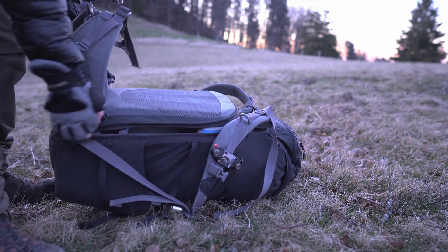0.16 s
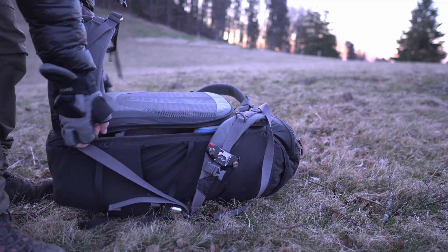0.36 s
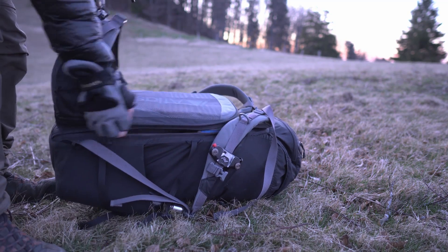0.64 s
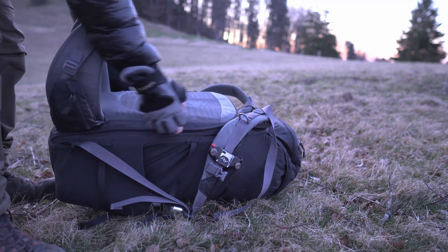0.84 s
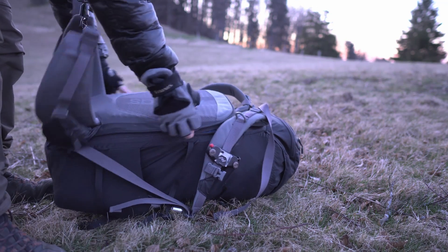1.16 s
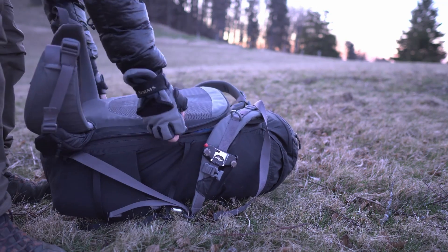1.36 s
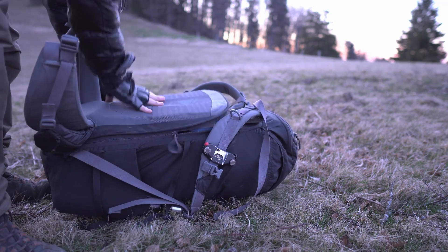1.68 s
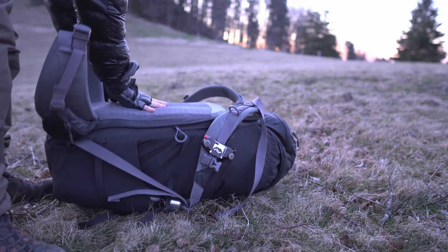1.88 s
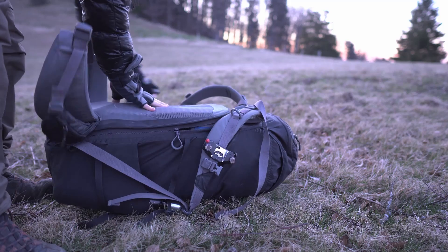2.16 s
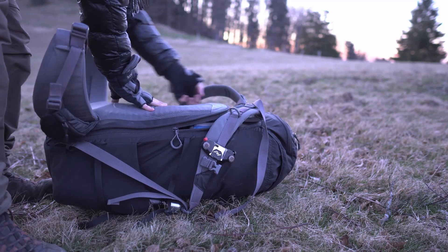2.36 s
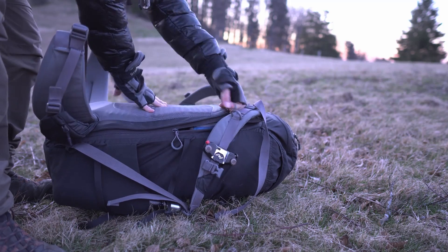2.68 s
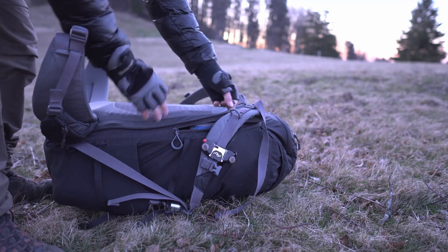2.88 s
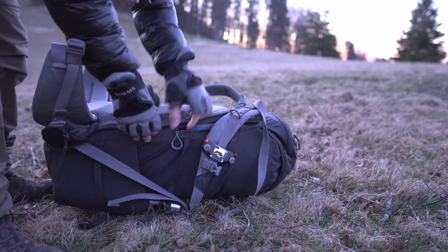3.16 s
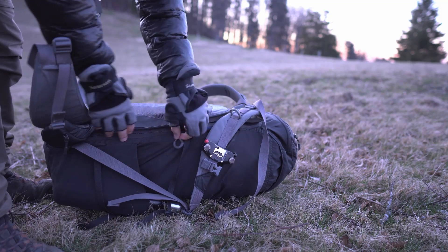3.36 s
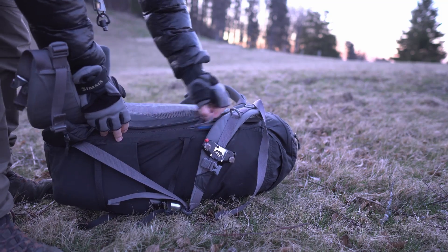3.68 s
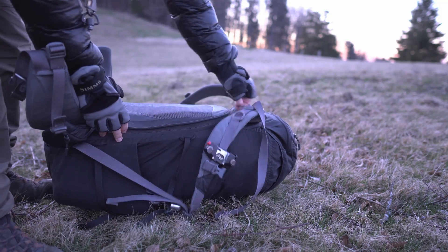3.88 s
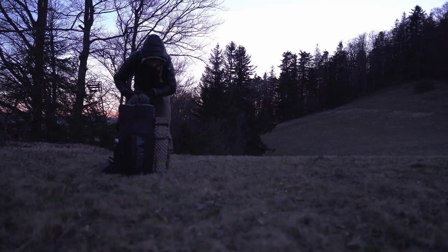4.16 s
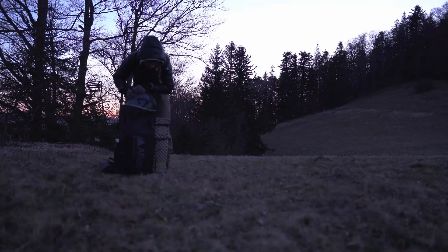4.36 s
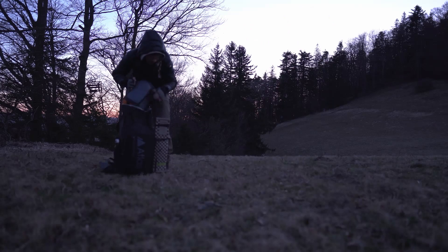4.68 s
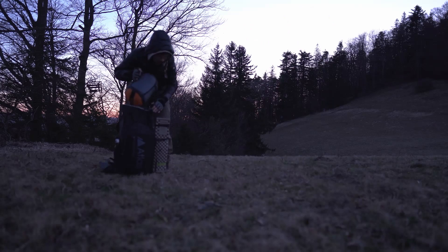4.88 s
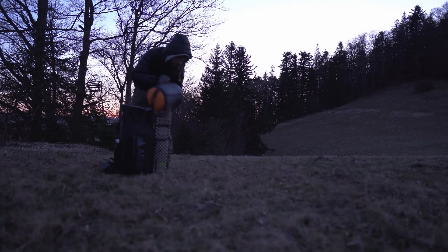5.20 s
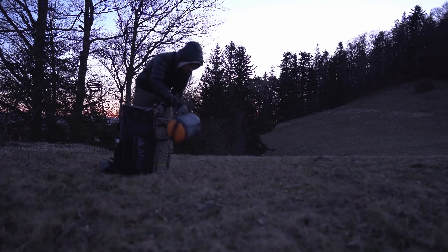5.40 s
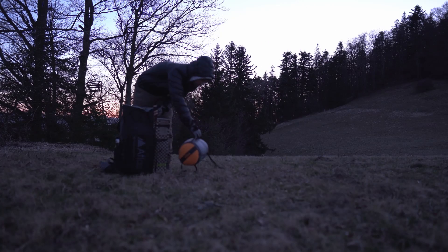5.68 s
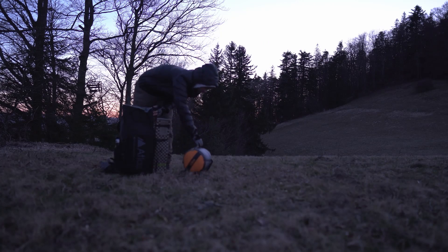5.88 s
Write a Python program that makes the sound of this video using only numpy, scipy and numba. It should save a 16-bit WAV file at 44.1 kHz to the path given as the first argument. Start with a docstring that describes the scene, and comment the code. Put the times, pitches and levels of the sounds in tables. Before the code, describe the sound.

Close up in a quiet meadow, a coil zipper on a padded backpack is drawn in short, uneven, buzzing strokes, with fabric rustle, tab ticks, a small buckle clink and soft thuds between. A last, louder zip ends abruptly; the background jumps to a louder wavering hum and hiss, a pack knocks down hard on dry grass, and a pot is set down softly in rustling grass.

```python
"""A coil zipper on a backpack is pulled shut in short strokes in a meadow; its teeth push on the slider one by one.
Cloth rustles as bands of crackling noise, tabs tick and a buckle rings as short fading tones, the bag thuds low.
Then, with the gain set higher, a pack is knocked down on dry grass and a pot is lowered into the grass.
Shaped noise makes the faint wind and hiss, which is louder and has a wavering hum in this second part."""
import sys
import numpy as np
from scipy import signal
from scipy.fft import rfft, irfft
from scipy.io import wavfile
from scipy.ndimage import uniform_filter1d
from numba import njit

SR = 44100
rng = np.random.default_rng(int(sys.argv[2]) if len(sys.argv) > 2 else 0)


def dump_mix(stems):
    """Bounce the given channels to the path in sys.argv[1] as a 16-bit WAV at rate SR."""
    frames = np.atleast_2d(stems).T  # one column per channel
    limited = np.clip(frames, -1, 1)  # hard clip at full scale
    pcm = np.round(limited * 32767).astype(np.int16)
    wavfile.write(sys.argv[1], SR, pcm)


N = 266364
STEP_S = 4.197  # the gain steps up here


def undb(db):
    """Turn decibels into a plain multiplier."""
    return 10 ** (np.asarray(db) / 20)


def unit(x):
    """Scale a sound to an average (rms) level of 1."""
    return x / np.sqrt(np.mean(x ** 2))


def columns(tables):
    """Join tables of (time_s, values) into one smooth curve a column."""
    time_s, *values = np.concatenate(tables).T
    return [np.interp(np.arange(N) / SR, time_s, v) for v in values]


def band(x, hz, width_hz):
    """One resonance: passes sound near its pitch, with gain 1 at the centre."""
    return signal.lfilter(*signal.iirpeak(min(hz, .45 * SR), hz / width_hz, SR), x)


def coloured(points):
    """Noise of rms 1 whose spectrum follows points of (pitch_hz, level_db)."""
    hz, db = np.transpose(points)
    f = np.fft.rfftfreq(N, 1 / SR) + 1
    gain = undb(np.interp(np.log(f), np.log(hz), db))
    return unit(irfft(rfft(rng.standard_normal(N)) * gain, N))


def walk(rate):
    """A curve that slides to a new random level this many times a second; spread near 1."""
    k = int(SR / rate)
    levels = np.repeat(rng.standard_normal(N // k + 1), k)
    return uniform_filter1d(levels, k)[:N]


def ring(hz, cycles, rise_s):
    """A struck object's tone: a soft contact, then a fade of 60 dB in so many cycles."""
    t = np.arange(int(cycles / hz * SR)) / SR
    fade = 1000 ** (-t * hz / cycles)
    return np.sin(2 * np.pi * hz * t) * fade * (1 - np.exp(-t / rise_s))


def add(out, s, x):
    """Mix a short sound into out, starting at s seconds."""
    i = int(s * SR)
    out[i:i + len(x)] += x[:N - i]


@njit
def teeth(hz, uneven, rough, chance, slip, scatter, stagger):
    """Left and right teeth push in turn, one row a little early; roughness scatters timing and size."""
    pulses, phase = np.zeros(len(hz) + 1), np.empty(len(hz))
    p, k = 0., 0  # way to the next tooth 0-1, teeth passed so far
    for i in range(len(hz)):
        side = 2 * (k % 2) - 1  # -1 for one row, +1 for the other
        step = 2 * hz[i] * np.exp(slip * rough[i] * chance[k, 0]) / (1 + stagger * side) / SR
        p += step
        if p >= 1:
            p, k = p - 1, k + 1
            side = 2 * (k % 2) - 1
            size = (1 + uneven[i] * side) * np.exp(scatter * rough[i] * chance[k, 1])
            # share the push between two samples, as it falls in between
            pulses[i] += size * p / step
            pulses[i + 1] += size * (1 - p / step)
        phase[i] = k + p
    return pulses[:-1], phase


# The pulls of the zipper, one list a stroke. Columns: time_s, tooth_pairs_hz (before the hand's jerks),
# level_db, unevenness of the two tooth rows (held to 0-1), roughness (held to 0-1)
STROKE_CURVES = [
    [(0, 560, -36.5, 0.78, 0.3), (.018, 576, -31, 1, 0.42), (.026, 546, -58, 0.9, .2)],
    [(.19, 140.9, -57, 0.6, 0.62), (.258, 199.5, -44, 1.04, 0.59), (.3, 209, -43, 0.68, 0.65),
     (.355, 158, -62, 0.87, 0.5)],
    [(.595, 198.6, -51.5, 1.17, .3), (.647, 208.3, -39, 0.59, 0.93), (.69, 340.9, -37.5, 0.52, 0.84),
     (.74, 261.6, -36.5, 0.69, 0.87), (.795, 359.2, -39.5, 0.25, 0.83), (.815, 451.6, -35, 0, 0.26),
     (.837, 537, -31, 0, 0.17), (.852, 404.3, -35.5, .15, 0.36), (.87, 501.4, -30, .15, 0.2),
     (.895, 422.3, -36.5, 0.4, 0.18), (.907, 453, -31.5, .5, 0.36), (.932, 309, -40, 0.82, 0.29),
     (.982, 208, -43, 0.95, 0.4), (1.06, 189, -58, .4, 0.75)],
    [(2.055, 276.6, -49.5, 0.7, 0.69), (2.102, 315.4, -39, 1.05, 0.42), (2.15, 233.8, -38, 1.2, 0.35),
     (2.165, 302, -38, 1.16, 0.22), (2.192, 572.5, -35, 0, 0.17), (2.225, 334.5, -34, 0.02, 0.42),
     (2.272, 227.5, -39.5, 0.06, 0.31), (2.305, 352.5, -35, 0.06, 0.36), (2.335, 1025, -38, 0, 0.24),
     (2.35, 952, -34, 0.02, 0.1), (2.362, 697, -36, 0.02, 0.16), (2.385, 988, -41, 0.48, 0.16),
     (2.407, 584, -38.5, 0.64, 0.4), (2.442, 564, -38, 1.15, 0.42), (2.465, 416, -45, 0.61, 0.65),
     (2.5, 479, -40, 0.78, .45), (2.537, 565.6, -31, 1.06, 0.06), (2.56, 483.4, -35.5, 0, 0.34),
     (2.577, 610, -29, 0.6, 0.34), (2.597, 410, -36.5, 0.8, 0.38), (2.617, 446, -36, 0.53, 0.43),
     (2.63, 563, -33, 0, 0.1), (2.667, 734, -39.5, 0, 0.28), (2.688, 517.6, -33, 0, 0.2),
     (2.702, 570, -40, 0.41, .45), (2.715, 433, -34, 0.37, 0.7), (2.735, 327.4, -42, 1.03, 0.73),
     (2.752, 299, -68, .9, .55)],
    [(3.64, 223.9, -64, 0.88, 0.92), (3.672, 255.4, -48.5, 1.09, 0.68), (3.705, 203, -40, 0.37, 0.65),
     (3.775, 370, -37, 0.81, 0.22), (3.82, 685, -30, 1.03, 0.17), (3.85, 556.5, -26.5, .22, .23),
     (3.875, 435, -28, 0.29, 0.44), (3.892, 390.6, -30, 0.16, 0.54), (3.902, 411.3, -22.5, 0, 0.53),
     (3.911, 290.2, -28, 0.8, 0.8), (3.925, 395.2, -29, 0.31, 0.61), (3.937, 471, -19, 0, .26),
     (3.947, 321, -30, 0.73, .2), (3.958, 422, -21.5, 0, .3), (3.98, 379, -24.5, 0.3, .15),
     (4.0, 402.5, -22.5, 0.5, .2), (4.022, 279.6, -26.5, 0.34, 0.37), (4.042, 283.7, -38.5, 0.86, 0.19),
     (4.056, 279, -72, 0.52, 0.2)],
]
# Resonances of slider and taut cloth. Columns: pitch_hz, width_hz, level_db (relative)
SLIDER_RESONANCES = [(283, 405, 6), (928, 366, 6), (1205, 186, 4), (2030, 610, -8.5), (2680, 1000, -16)]
# Grit of each stroke at the pivot level and 400 pairs a second. Column: level_db
STROKE_GRIT_DB = [-54.5, -46, -50, -54.5, -49.5]
GRIT_PIVOT_DB, GRIT_FOLLOW = -36.5, 0.5  # share of level changes the grit follows
GRIT_DB_PER_OCTAVE = 6.5  # its rise with speed


def zipper():
    """Teeth ring the slider, the slider rocks once a pair, grit follows each tooth; the pull shakes the bag."""
    hz, db, uneven, rough = columns(STROKE_CURVES)
    last_samples = [t[-1][0] * SR for t in STROKE_CURVES[:-1]]
    stroke = np.searchsorted(last_samples, np.arange(N))
    grit_db = np.take(STROKE_GRIT_DB, stroke) + GRIT_FOLLOW * (db - GRIT_PIVOT_DB)
    grit_db = grit_db + GRIT_DB_PER_OCTAVE * np.log2(hz / 400)
    uneven = np.clip(uneven, 0, 1)
    rough = np.clip(rough, 0, 1)
    hz = hz * (1 + (0.027 + .07 * rough) * walk(80))  # the hand jerks
    chance = rng.standard_normal((N // 20, 2))
    pulses, phase = teeth(hz, uneven, rough ** 1.4, chance, slip=.34, scatter=.55, stagger=.12)
    gate = np.exp(-(phase % 1) / 2.4)  # fades a little from each tooth to the next

    push = pulses - uniform_filter1d(pulses, size=400)  # keep the jolts, drop the steady push
    push = push + 0.054 * rough * gate * rng.standard_normal(N)
    body = sum((-1) ** k * undb(g_db) * band(push, f, w) for k, (f, w, g_db) in enumerate(SLIDER_RESONANCES))
    body = signal.sosfilt(signal.butter(2, 3200, fs=SR, output="sos"), body)
    # level follows the hand, not the tooth rate
    body = body / np.sqrt(uniform_filter1d(body ** 2, size=900) + 1e-12)

    # tape drags through the slider
    scrape = coloured([(200, -19), (600, -0.5), (1200, -5.5), (2200, -12.0), (3500, -29), (16000, -46)])
    scrape = (.04 + .6 * rough ** 1.4) * undb(2.5 * walk(200)) * scrape
    body = np.sqrt(1 - .5 * rough) * body + scrape
    rock = 2.33 * uneven ** 2.56 * undb(7.2 * rough * walk(120)) * np.sin(np.pi * phase)

    grit = coloured([(1500, -30), (2500, 0), (3300, -6), (6000, -10), (10000, -19), (16000, -17)])
    grit = gate * undb(2.2 * walk(150)) * grit
    hard_edge = unit(band(band(push, 2950, 4100), 3600, 4000))  # of each tooth
    grit = unit(grit) + 1.1 * hard_edge * np.sqrt(400 / hz)

    time = np.arange(N)
    moving = sum((time > t[0][0] * SR) & (time < t[-1][0] * SR) for t in STROKE_CURVES)
    shake = coloured([(20, 3.5), (60, 2.5), (160, 0.5), (300, -23), (16000, -86)])
    shake = uniform_filter1d(1. * moving, size=2000) * shake
    slider = undb(db) * (body + rock) / np.sqrt(1 + uneven ** 2)
    return moving * (slider + undb(grit_db) * unit(grit)) + undb(-56.5) * shake


# Swells of cloth and grass rubbing; rise and fall each span 20 dB. Columns: peak_s, peak_db, rise_s, fall_s,
# body_db (under 1.5 kHz, over the peak), top_db (top octave, over the peak)
RUSTLE_SWELLS = [(0.0, -52, .01, 0.31, 4.5, -5), (.2, -61, .3, 0.29, 8.5, -12),
                 (.4, -54.5, 0.052, 0.062, 5, -18), (1.111, -64, 0.21, 0.28, 2.5, -18),
                 (1.54, -75.5, 0.092, 0.24, 12, -14), (1.79, -58.5, 0.11, 0.064, 0.5, -14),
                 (2.85, -60, 0.05, 0.12, -17, 2.5), (3.11, -70, 0.049, 0.3, -11, -14),
                 (3.332, -58, 0.062, .12, -2.5, 0), (3.47, -58.5, 0.095, 0.054, -32, -1.5),
                 (4.08, -66.5, 0.041, 0.18, -5, -14), (4.15, -60.5, 0.1, 0.032, -8, -2),
                 (4.2, -39, .005, 0.16, 1, -20), (4.339, -25, 0.12, 0.21, -4, -19),
                 (4.45, -40.5, 0.3, 0.58, -3, -3), (5.5, -57, 0.2, 0.3, -10, 7.5),
                 (6.022, -33, 0.075, .3, -10, 4.5)]
# steady faint rubbing before and after the gain step, in dB: body, middle, top
NEAR_BED_DB, FAR_BED_DB = (-71, -73, -70.5), (-57.5, -59, -74)


def rustle():
    """Dense crackle of fibres: three bands share the grains and swells; body and top also flicker alone."""
    t = np.arange(N) / SR
    power = np.where(t < STEP_S, undb(NEAR_BED_DB)[:, None], undb(FAR_BED_DB)[:, None]) ** 2
    for s, db, rise_s, fall_s, body_db, top_db in RUSTLE_SWELLS:
        swell = undb(db - 20 * np.where(t < s, (s - t) / rise_s, (t - s) / fall_s))
        swell = swell * ((t < STEP_S) == (s < STEP_S))  # stays on its own side of the gain step
        power = power + (undb([[body_db], [0], [top_db]]) * swell) ** 2
    body, middle, bright = np.sqrt(power)
    grain = undb(3.0 * walk(600) + 1.3 * walk(90))
    low = coloured([(150, 19.5), (400, 12.5), (1200, 10.5), (2200, -16)])
    mid = coloured([(1000, 0.5), (2200, 3), (5000, -0.5), (8500, -6.0), (11000, -15.0)])
    top = coloured([(7000, -9.5), (10500, -17.5), (15000, -10.5)])
    body_sound = body * undb(0.95 * walk(60)) * unit(grain * low)
    bright_sound = bright * undb(1.5 * walk(65)) * unit(grain * top)
    return middle * unit(grain * mid) + body_sound + bright_sound


# Spectrum of the air before the gain step. Columns: pitch_hz, level_db (per Hz, relative)
NEAR_SPECTRUM = [(12, -44), (20, 8.5), (63, 3.5), (301, -4.5), (367, -10), (513, -16.5), (825, -48),
                 (1530, -17), (5680, -37), (16000, -57)]
# Spectrum of the air after the gain step. Columns: pitch_hz, level_db (per Hz, relative)
FAR_SPECTRUM = [(12, -42), (20, -2), (60, -15), (130, 1), (172, -5), (210, 3), (262, -12), (607, -24.5),
                (2820, -38), (3070, -38), (6360, -34.5), (9670, -39.5), (14700, -33.5), (16000, -37)]
NEAR_DB, FAR_DB = -64, -41.5  # levels the air wavers around


def air():
    """Faint wind and microphone hiss as noise; louder, with a wavering hum, after the step."""
    near = coloured(NEAR_SPECTRUM) * undb(NEAR_DB + 0.5 * walk(2.3))
    far = coloured(FAR_SPECTRUM) * undb(FAR_DB + 0.31 * walk(14.0))
    return np.where(np.arange(N) < STEP_S * SR, near, far)


# small stray ticks while the hands move about: lowest level, average extra level, middle pitch, snap over level
FAINT_TICK_DB, FAINT_SCATTER_DB, FAINT_TICK_HZ, FAINT_SNAP_DB = -62.5, 2, 2000, 4


def faint_ticks(count):
    """Random rows like the tick table's, before the gain step, within an octave of the middle pitch."""
    when, size, pitch = rng.random((count, 3)).T
    start_s = when * STEP_S
    level_db = FAINT_TICK_DB - FAINT_SCATTER_DB * np.log(1 - size)  # mostly faint, a few louder
    pitch_hz = FAINT_TICK_HZ * 2 ** (2 * pitch - 1)
    return [(s, db, hz, FAINT_SNAP_DB) for s, db, hz in zip(start_s, level_db, pitch_hz)]


# Ticks and knocks of tabs, straps and hard contents.
# Columns: start_s, level_db (near the peak), pitch_hz, snap_db (over level_db)
TICK_HITS = [(0.043, -35, 740, -18), (0.142, -41.5, 970, -9), (0.188, -46, 540, -8.5),
             (0.176, -51, 4500, -2), (0.374, -39, 4800, -19), (0.418, -43, 780, -17),
             (0.598, -44, 700, -15), (0.697, -42, 2230, 2.5), (0.7616, -43, 1780, -1),
             (0.7776, -26.5, 5870, -14), (1.102, -43, 457, -25), (1.187, -45.5, 740, -26),
             (1.373, -49.5, 1870, -34), (1.43, -49, 3900, -11.5), (1.482, -52, 611, -15),
             (1.519, -40, 586, -7), (1.601, -37.5, 484, -21), (1.608, -40.5, 640, -1),
             (1.759, -33, 2450, -15.5), (1.77, -40, 810, 0), (2.039, -50, 770, -20), (2.056, -43, 809, -18),
             (2.839, -37, 2080, -7), (3.198, -46.5, 1470, -13), (3.366, -41.5, 2350, 1),
             (3.513, -46, 2690, -3), (3.8656, -24, 2044, -6), (3.905, -26, 1882, -12),
             (3.9227, -18.5, 2072, -8), (3.993, -48, 2502, -11), (4.136, -45.5, 1118, -19),
             (4.15, -46, 1760, -11), (4.199, -38, 1060, -22), (4.2423, -29, 1800, -28),
             (4.273, -16.5, 1490, -35), (4.284, -11.5, 880, -34), (4.297, -5, 843, -28),
             (4.305, -9.5, 810, -22), (4.314, -10.5, 1020, -32), (4.319, -10.5, 1120, -18),
             (4.331, -13.5, 2320, -29), (4.382, -15, 1190, -30), (4.811, -39, 5616, -5),
             (5.003, -36, 905, -12), (5.398, -41.5, 815, -19), (5.461, -35.5, 5740, -2.5),
             (5.746, -27, 1530, -15), (5.765, -36, 980, 0), (5.793, -37, 1290, -5), (5.858, -45, 1010, -18)]


def ticks():
    """Small hard parts meet: each makes a short ring, a noisy crack and a bright snap."""
    out = np.zeros(N)
    crack = coloured([(300, -1), (1000, 19.5), (3000, 12.0), (6000, -68)])
    snap = coloured([(1500, -36), (3200, -10), (6000, 0), (15000, -2)])
    fade = 1000 ** (-np.arange(SR // 40) / (0.034 * SR))  # 60 dB in 34 ms, cut at 25 ms
    for s, db, hz, snap_db in TICK_HITS + faint_ticks(count=24):
        i = int(s * SR)
        add(out, s, undb(db + 0.5) * ring(hz, cycles=18.0, rise_s=0.00015))
        crack_part = 0.38 * fade * crack[i:i + len(fade)]
        snap_part = 1.03 * undb(snap_db) * fade ** 1.6 * snap[i:i + len(fade)]
        add(out, s, undb(db) * (crack_part + snap_part))
    return out


# Soft thuds of the padded bag. Columns: start_s, level_db (near the peak), pitch_hz
THUD_HITS = [(0.093, -43, 141), (0.115, -36, 242), (0.395, -38, 160), (1.762, -38, 142), (2.999, -48, 97),
             (3.083, -42.5, 61), (3.248, -47, 151), (3.292, -40.5, 102), (3.338, -43, 125),
             (3.441, -42, 77.5), (4.199, -31.5, 147.8), (4.276, -10.5, 184), (4.286, -10, 88.5),
             (4.379, -9.5, 179), (6.014, -24.5, 154)]


def thuds():
    """The padded bag gives one slow swing that dies within a few cycles."""
    out = np.zeros(N)
    for s, db, hz in THUD_HITS:
        add(out, s, -undb(db) * ring(hz, cycles=5.8, rise_s=0.00041))
    return out


# Tones of the struck buckle. Columns: pitch_hz, level_db (over BUCKLE_DB), fade_s (time to fall 60 dB)
BUCKLE_TONES = [(715, 0, .055), (964, -19, .22), (1460, -5, .04), (1715, -19, .3), (2300, -12, .03),
                (2815, -12, .06), (3200, -16, .07)]
BUCKLE_S, BUCKLE_DB = 1.662, -39.5


def buckle():
    """One knock sets off all the buckle's tones, each fading at its own pace."""
    out = np.zeros(N)
    for hz, db, fade_s in BUCKLE_TONES:
        add(out, BUCKLE_S, undb(BUCKLE_DB + db) * ring(hz, cycles=hz * fade_s, rise_s=.0006))
    return out


def scene():
    """Add up all the sources, the same in both channels."""
    hits = ticks() + thuds() + buckle()
    # a small bag radiates no deep bass
    hits = signal.sosfilt(signal.butter(4, 52, "high", fs=SR, output="sos"), hits)
    mono = zipper() + rustle() + air() + hits
    return np.array([mono, mono])


def record(dry):
    """A single microphone that rounds the loudest peaks, cut steeply at the top."""
    rounded = np.tanh(1.326 * dry) / 1.28
    return signal.sosfilt(signal.ellip(10, .2, 60, 15900, fs=SR, output="sos"), rounded)


dry = scene()
out = record(dry)
dump_mix(out)
```